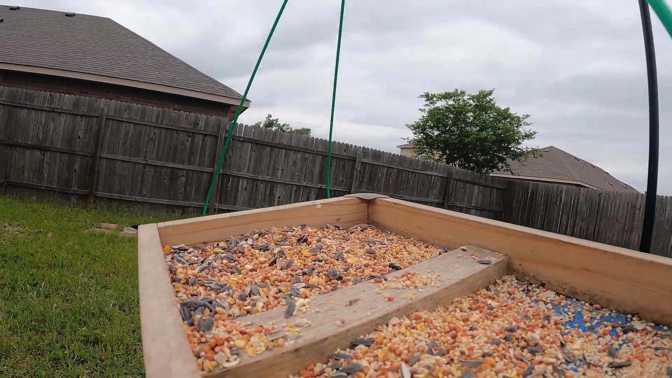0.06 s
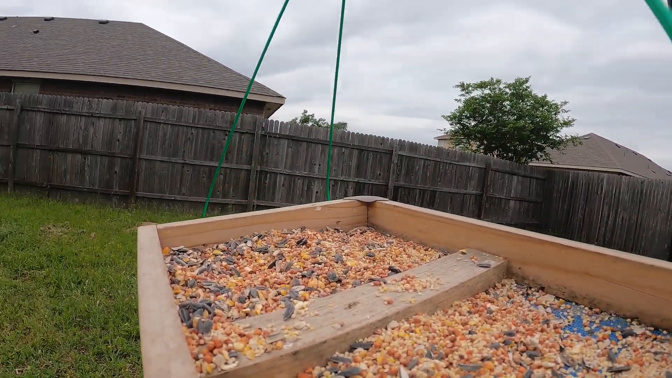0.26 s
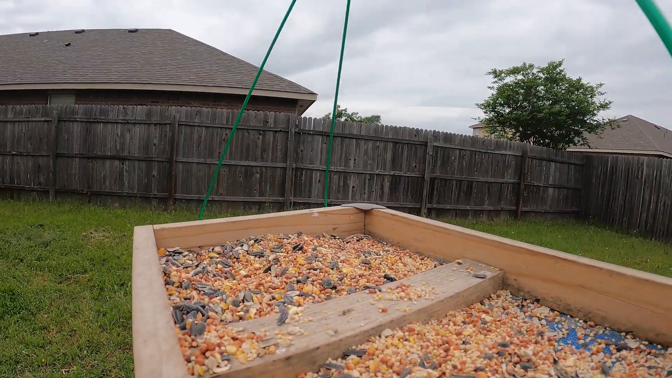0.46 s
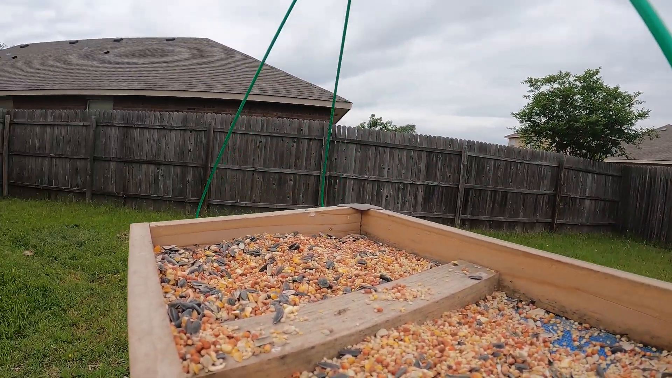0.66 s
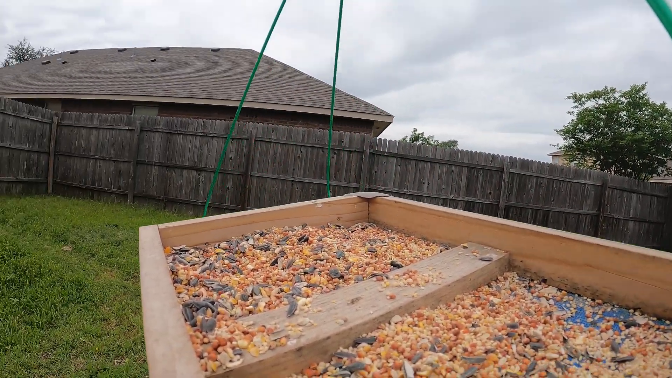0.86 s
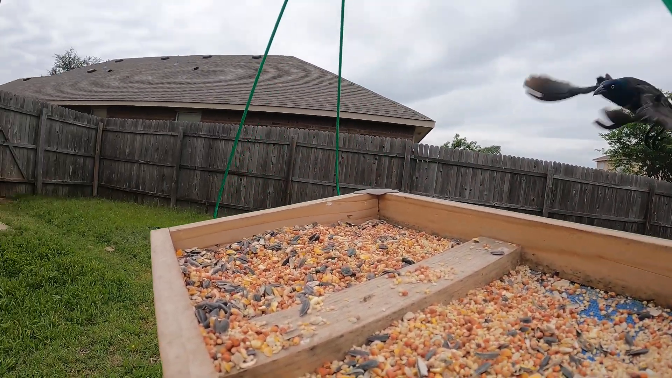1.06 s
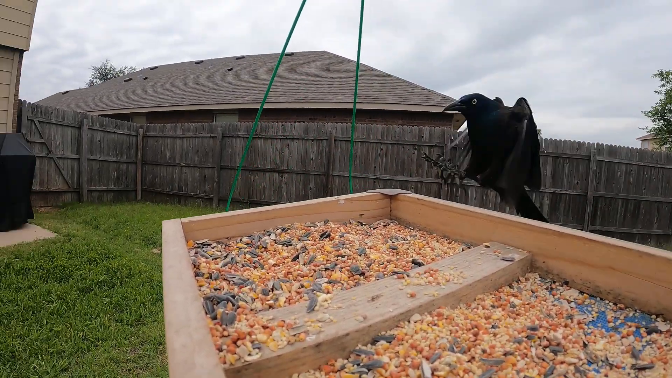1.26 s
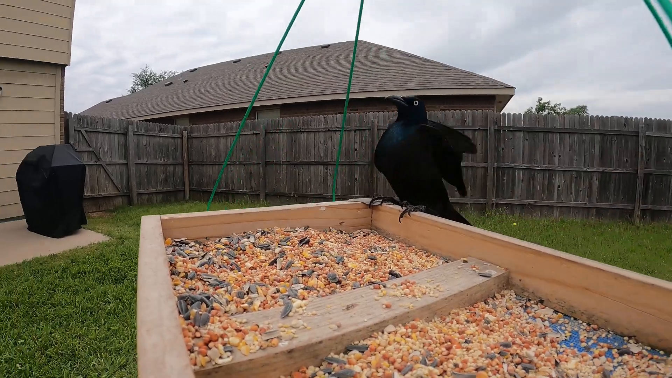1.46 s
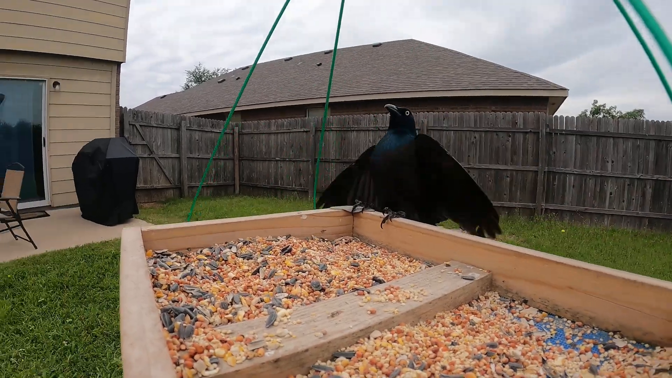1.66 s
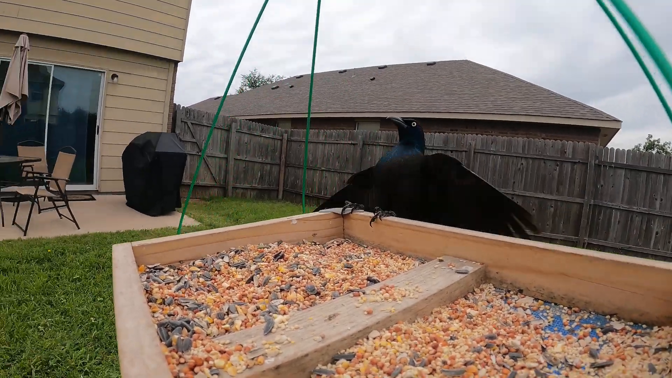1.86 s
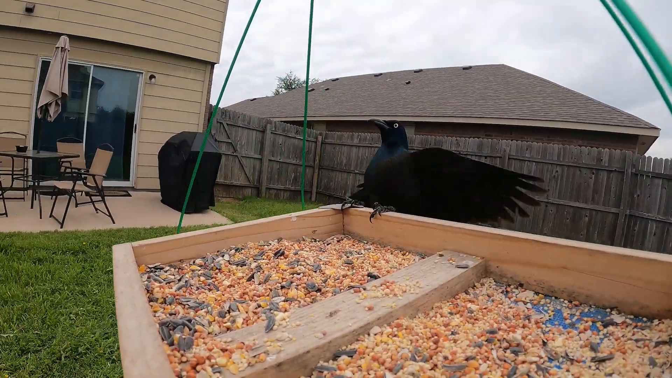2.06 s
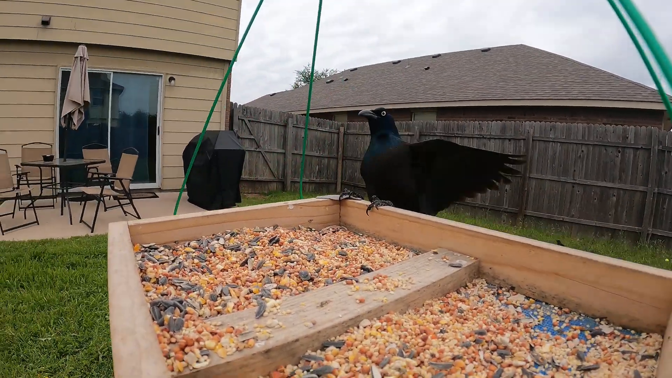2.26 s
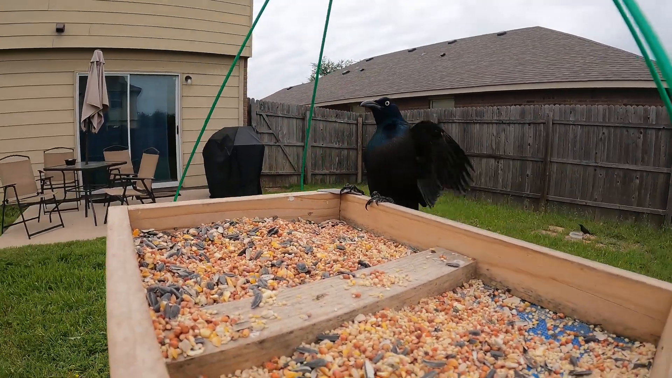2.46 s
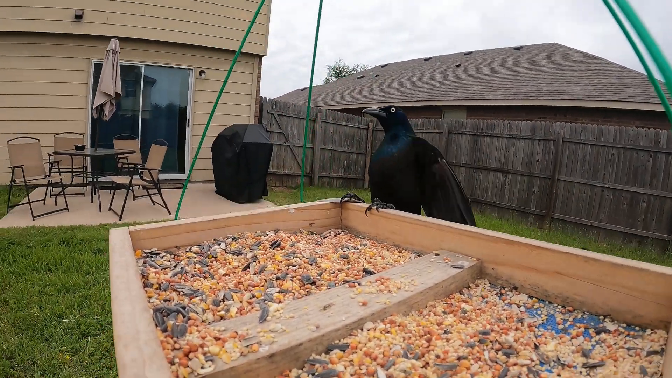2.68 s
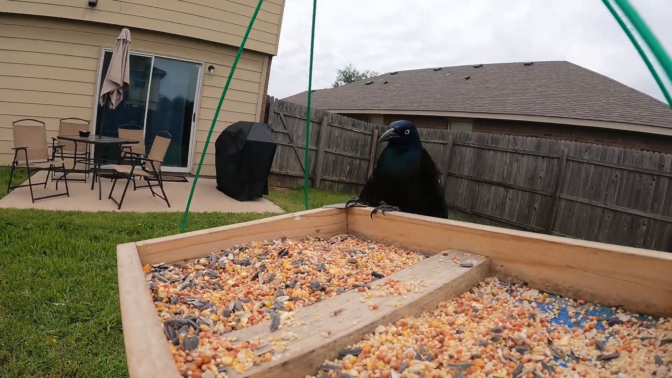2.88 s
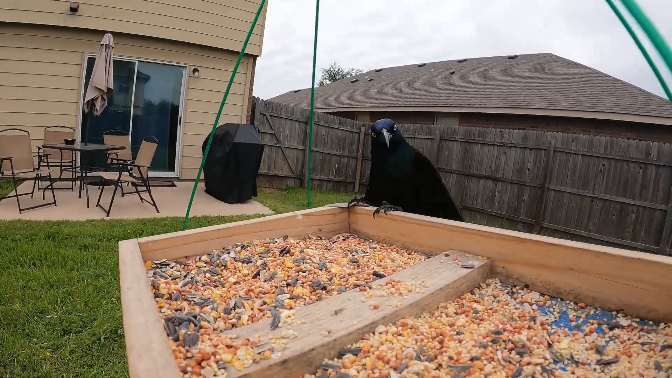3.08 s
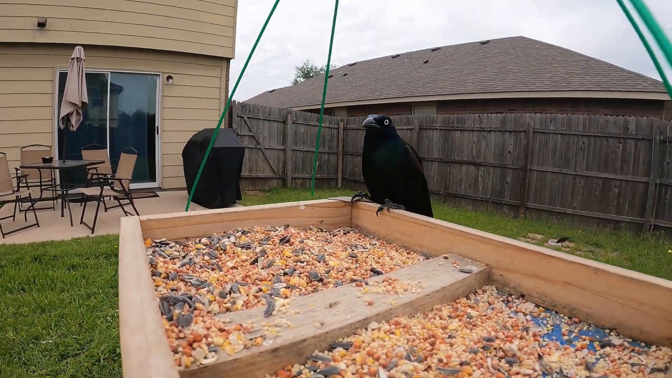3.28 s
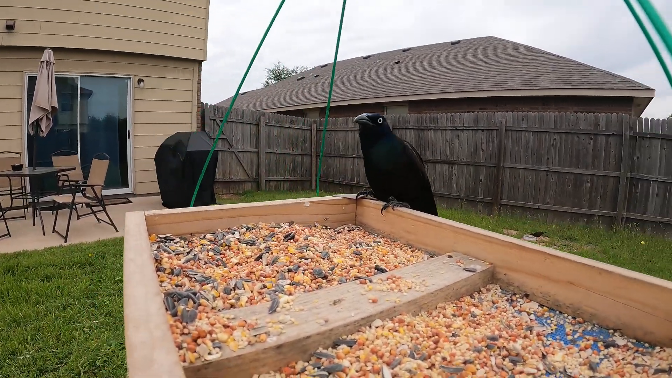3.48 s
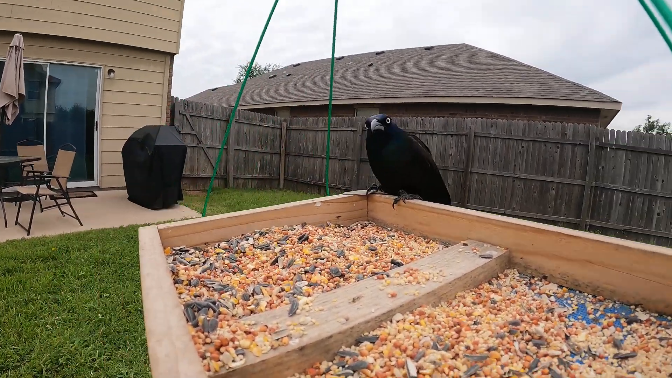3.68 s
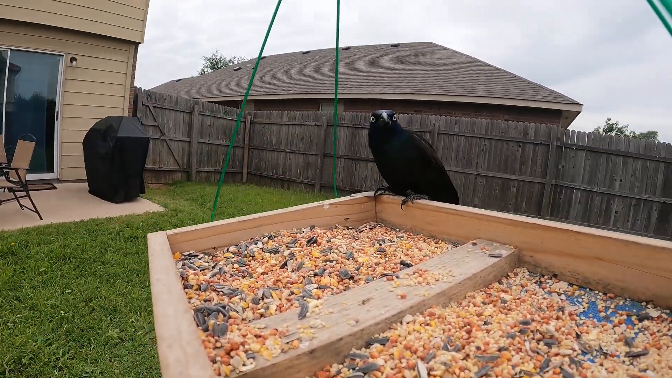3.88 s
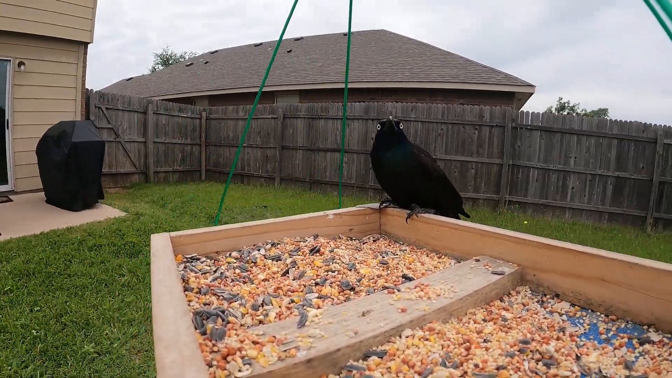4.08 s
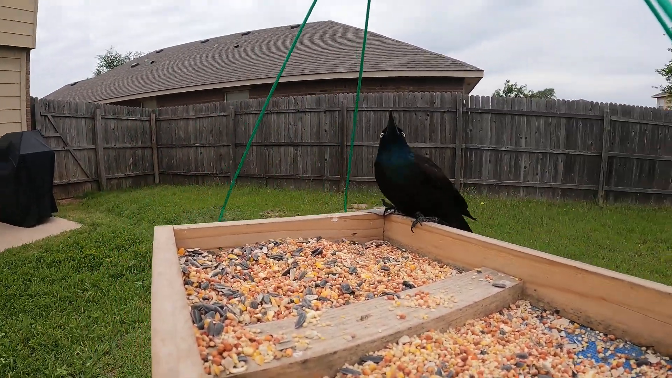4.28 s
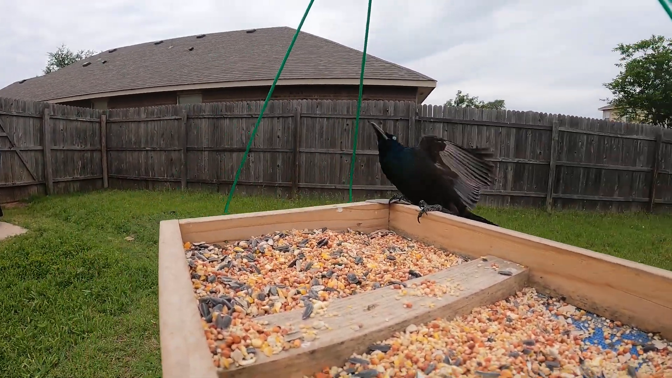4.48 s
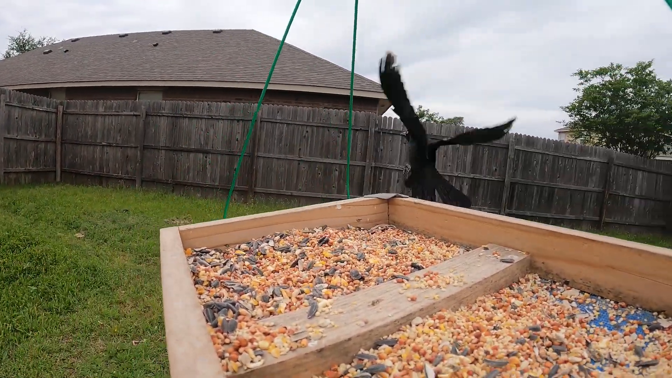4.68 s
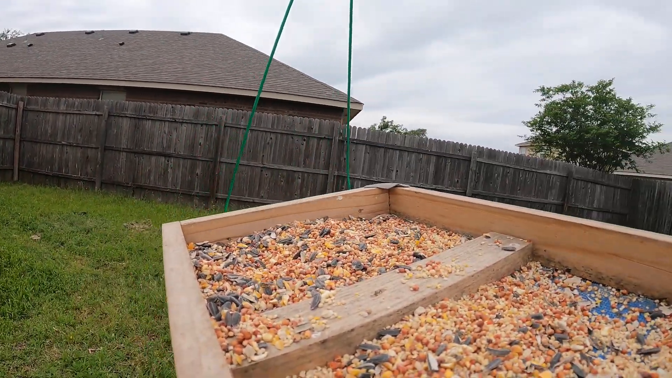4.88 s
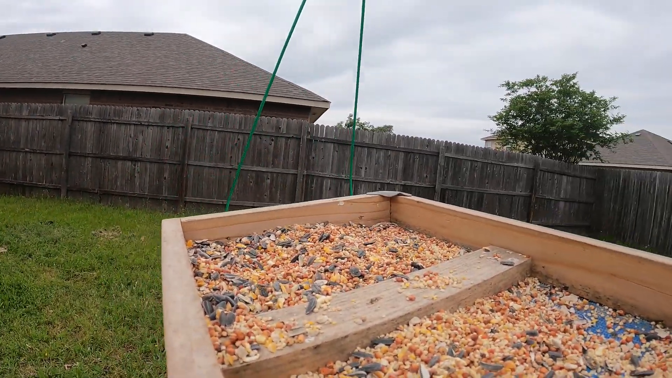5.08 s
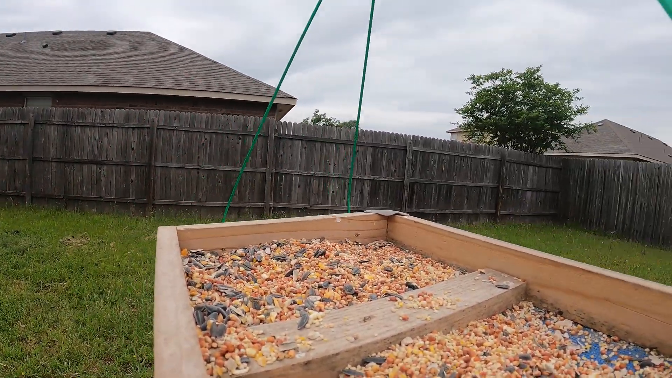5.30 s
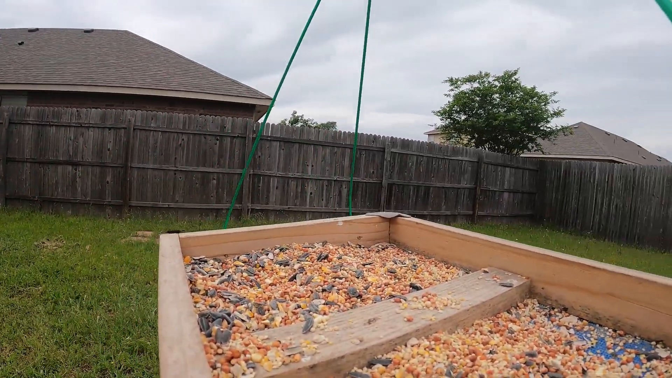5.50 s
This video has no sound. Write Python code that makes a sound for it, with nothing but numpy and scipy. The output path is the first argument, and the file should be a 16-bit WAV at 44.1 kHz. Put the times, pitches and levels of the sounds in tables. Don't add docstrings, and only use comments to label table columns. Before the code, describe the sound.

Close stereo pickup at a wooden seed tray in a yard. A big bird arrives with rapid feathery flaps and low wind thuds, lands with one hard knock, and flutters regularly while a distant bird croaks. Small chirps follow; then claw clicks, a heavy gusty take-off, receding wingbeats and far whistles.

```python
import sys
import numpy as np
from scipy import signal
from scipy.fft import rfft, irfft, next_fast_len
from scipy.io import wavfile
from scipy.ndimage import map_coordinates

SR = 44100
rng = np.random.default_rng(int(sys.argv[2]) if len(sys.argv) > 2 else 0)


def ratio_of_db(decibels):
    return 10 ** (np.asarray(decibels, float) / 20)


def wav_record(signal):
    frames = np.transpose(np.atleast_2d(signal))
    bounded = np.clip(frames, -1, 1)
    quanta = np.round(bounded * 32767).astype(np.int16)
    wavfile.write(sys.argv[1], SR, quanta)


N = 244314
T = np.arange(N) / SR

# frequency [Hz], level [dB].
TRAFFIC_SPECTRUM = [(140, -25), (230, -10.5), (270, -19), (420, -14.5), (800, -15), (1300, -14),
                    (2500, -35.5), (3500, -43.5),
                    (5700, -38.5), (9000, -49.5), (10000, -41.5), (10900, -51.5), (12200, -57.5),
                 (13200, -76.5), (14500, -96)]
# time [s], level [dB].
TRAFFIC_LEVEL = [(0.0, -63), (.7, -62.5), (1.39, -56.5), (1.56, -63), (3.5, -64), (4.15, -62.5),
                 (4.9, -64.5), (5.54, -63)]
# time [s], shaft rate [Hz], fifth order [dB], other orders [dB].
ENGINE_RUN = [(0, 20.29, -46.5, -61.5), (.37, 20.44, -46.5, -48.5), (1, 20.86, -54, -47.5),
              (1.6, 21.07, -47.5, -50), (2.5, 21.26, -48, -50), (3, 21.23, -46, -48.5),
              (3.65, 21.54, -43.5, -48.5), (3.78, 21.5, -60.5, -55.5), (4.15, 22, -49, -59),
              (4.35, 21.98, -54, -68), (5.54, 22.25, -62, -70)]
# multiple of the shaft rate, level [dB].
ENGINE_ORDERS = [(2, -16), (3, -2.5), (5, 3), (6, -2.5), (7, -9.5), (8, 4), (9, -8.5), (10, -2), (13, -26),
                 (15, -22)]
# start [s], end [s], first pitch [Hz], last pitch [Hz], level [dB].
WHISTLES = [(4.468, 4.535, 4420, 4390, -69.5), (4.525, 4.615, 4390, 4360, -73),
            (4.718, 4.795, 3500, 3490, -66), (4.795, 4.825, 3490, 3480, -73),
            (4.832, 4.935, 3465, 3495, -74), (4.935, 4.97, 3450, 3430, -79),
            (4.978, 5.032, 3425, 3445, -77), (5.03, 5.11, 3415, 3430, -73), (5.112, 5.2, 3440, 3420, -74),
            (5.2, 5.235, 3415, 3410, -78), (5.19, 5.295, 4170, 4265, -70.5), (4.72, 4.82, 4390, 4390, -79),
            (4.825, 4.95, 4390, 4400, -86)]
# start [s], end [s], pitch [Hz], level [dB], blur [Hz].
NOTES = [(3.78, 3.87, 2680, -81, 300), (4.02, 4.09, 2600, -79, 260), (4.1, 4.2, 2660, -78.5, 260),
         (4.21, 4.29, 2650, -79, 260), (4.275, 4.315, 3060, -77, 250), (3.7, 3.82, 4880, -81, 300),
         (3.87, 3.985, 4930, -78, 230), (3.99, 4.06, 4930, -77, 200), (4.08, 4.17, 4900, -79.5, 300),
         (4.165, 4.27, 4930, -80.5, 280), (3.87, 4.02, 2620, -83, 300), (3.67, 3.692, 2900, -68, 500),
         (3.665, 3.685, 3400, -70, 500), (5.32, 5.39, 6240, -73, 150), (4.85, 4.92, 6200, -74, 130),
         (4.91, 4.985, 6290, -73, 150), (5.3, 5.36, 3960, -64, 300)]
# start [s], top pitch [Hz], length [s], level [dB].
CHIPS = [(3.016, 4400, .03, -63), (3.132, 4350, .028, -64), (3.272, 4380, .04, -67),
         (3.386, 4420, .035, -68), (3.524, 4400, .055, -66), (3.655, 3900, .036, -69),
         (3.712, 2700, .03, -65), (3.745, 2700, .03, -65), (3.716, 4950, .024, -66),
         (3.792, 4350, .032, -64), (3.795, 4950, .02, -70), (3.908, 4400, .04, -70)]
# frequency [Hz], level [dB per Hz].
RASP_SPECTRUM = [(1800, -13.5), (2700, 5), (3900, -3), (5000, -5), (6500, -9.5), (9000, -26)]
# start [s], end [s], first pitch [Hz], last pitch [Hz], level [dB].
CROAK_BANDS = [
    (1.95, 2.27, 1170, 1210, -58),
    (1.94, 2.22, 2970, 2930, -58.5),
    (2.2, 2.36, 2930, 2900, -61.5),
    (1.94, 2.38, 5700, 5640, -67),
    (5.18, 5.33, 4100, 4060, -64),
    (5.22, 5.4, 3720, 3780, -67),
    (5.3, 5.6, 4130, 4180, -60),
    (5.31, 5.6, 4330, 4370, -65),
    (5.38, 5.6, 3790, 3770, -63.5),
]
# frequency [Hz], correlation [0 to 1].
FAR_LIKENESS = [(60, 0.92), (150, 0.85), (290, 0.73), (640, 0.56), (1400, 0.55), (2600, 0.28), (6800, 0.73),
                (15000, 0.29)]

# time [s], rumble level [dB].
BREEZE = [(0, -52), (.12, -43), (.85, -50.5), (1.2, -32), (1.6, -38), (2.79, -39), (4.1, -51),
          (4.35, -48.5), (4.6, -38), (5.2, -45.5), (5.43, -41), (5.54, -52)]
# time [s], rumble level [dB], width [ms], flutter below rumble [dB].
DRAUGHTS = [(.94, -38, 74, 19.5), (1.05, -38, 78, 12), (1.147, -32, 26, 14), (1.18, -27, 40, 43),
            (1.219, -26.5, 43, 22), (1.309, -28.5, 38, 15), (1.37, -23.5, 18, 31), (1.42, -43, 35, 18.5),
            (1.45, -28.5, 52, 17), (4.21, -42.5, 76, 28), (4.42, -44, 44, 5.5), (4.57, -34.5, 145, 33),
            (4.63, -49, 92, 9), (4.703, -27, 68, 18.5), (4.85, -25.5, 34, 28), (4.892, -18.5, 68, 21),
            (4.983, -24.5, 56, 18), (5.091, -28.5, 68, 26)]
# frequency [Hz], level [dB].
RUMBLE_SPECTRUM = [(10, -10), (25, -4.5), (45, -4), (90, -12), (160, -26.5), (300, -33), (500, -95)]
# frequency [Hz], level [dB].
FLUTTER_SPECTRUM = [(50, -27), (90, 2.5), (160, -1.5), (280, -10), (450, -27), (900, -67.5)]
# time [s], left minus right [dB].
WASH_PAN = [(0, -1), (4.4, 0.5), (4.9, -6), (5.54, 1.5)]

# time [s], peak [dB], brightest pitch [Hz], knock in the wood [dB], scratch beside the ring [dB].
GRIPS = [(0.382, -49, 1000, -14, -10), (0.743, -57.5, 4800, -16, -4), (0.971, -49, 1100, -15, -1),
         (0.9763, -38, 2460, -22, -7), (1.124, -36, 1300, -5, -9), (1.135, -38, 1490, -6, -6),
         (1.148, -39, 1313, -6, -6), (1.318, -40, 1100, -9, -1), (1.4053, -13.5, 3940, -9.5, 0),
         (1.4055, -15, 2404, -20.5, -2), (1.4054, -25, 5530, -21, -2.5), (1.408, -23, 1740, -3, 1.5),
         (1.4113, -24, 3270, -3.5, 0.5), (1.416, -32, 2820, -5, 0), (1.418, -32, 4670, -4, -3),
         (1.4222, -29.5, 3800, -8, 2.5), (1.4243, -26.5, 3350, -5, 0), (1.455, -39.5, 4580, -4, -6),
         (1.488, -41, 4700, -7, -6), (1.491, -42, 4900, -7, -6), (1.504, -33.5, 4230, -4.5, -8),
         (1.668, -44, 3870, -9, 3), (1.8248, -46.5, 3340, -6, -3), (1.946, -39, 1910, -12, -4),
         (2.033, -46, 3300, -20, -1), (2.045, -45, 6300, -16, -2), (2.131, -43, 4130, -4, 0),
         (2.214, -46, 6390, -20, -3), (2.268, -39, 1820, -24, -1.5), (2.371, -38, 1670, -19, -10),
         (3.1713, -48.5, 4848, -20, -2), (3.18, -51, 4730, -18, 1)]
# time [s], peak [dB], brightest pitch [Hz], knock in the wood [dB], scratch beside the ring [dB].
PUSH_OFF = [(4.359, -60, 2580, -8, 0), (4.4, -45.5, 2260, 7.5, 1), (4.441, -40.5, 2300, -4, -2),
            (4.509, -41.5, 4330, -11, 0), (4.6064, -33.5, 2100, -4.5, -8), (4.6178, -44, 1300, 11, -10),
            (4.6222, -25.5, 4120, 8, -2.5), (4.6611, -30, 5960, -12, 2), (4.6642, -23.5, 3350, -13, -14),
            (4.6725, -23.5, 2270, -17, -4), (4.675, -22.5, 4050, -25, -7), (4.6796, -20.5, 3014, -18, -14),
            (4.679, -22.5, 2320, -15, -13), (4.683, -25, 4240, -23, -20), (4.6963, -32.5, 3060, -14, -10),
            (4.764, -28, 2330, -16, -7), (4.809, -38, 2800, -9, -4), (4.968, -58, 3450, -14, 1),
            (5.324, -44, 1820, -15, -2)]
# frequency [Hz], level [dB].
SCRATCH_SPECTRUM = [(600, -34), (1300, -5), (2300, 3.5), (4200, 1), (7000, -2.5), (9000, -16.5),
                    (12500, -28), (16000, -46)]
# frequency [Hz], width [Hz], level [dB].
BOARD_MODES = [(383, 170, 4.5), (537, 500, -5.5), (953, 60, 1.5)]
# frequency [Hz], width [Hz], level [dB].
RIM_MODES = [(1265, 180, 6.5), (2310, 410, -24)]

# time [s], level [dB].
RUSTLE = [
    [(0.76, -110), (1.16, -54.5), (1.49, -68.5), (3.04, -71), (3.3, -77.5)],
    [(4.3, -83), (4.578, -79), (5.54, -73.5)],
]
# time [s], swish [dB], width [ms], dullness as lower air over swish [dB].
LANDING = [(0.822, -59.5, 42, -5), (0.856, -63, 42, 1.5), (0.895, -52, 8.6, -1.5), (0.918, -54, 15, 0.5),
           (0.947, -59, 41, 1.5), (0.99, -52.5, 36, 2), (1.032, -54, 19, 1), (1.061, -48.5, 13, 5),
           (1.078, -45, 11, -10.5), (1.094, -57.5, 9.5, -2), (1.123, -50, 13, -20), (1.153, -50.5, 16, -4),
           (1.167, -48, 19, 1), (1.18, -64, 9.9, -1), (1.225, -53.5, 50, 6.5), (1.244, -44, 15.4, -7),
           (1.296, -52.5, 30, 3), (1.328, -48.5, 25, 2.5), (1.371, -55, 46, 4.5), (1.46, -60, 83, 9),
           (1.503, -66, 18, 4), (1.61, -63.5, 19, 3)]
# time [s], swish [dB], dullness [dB], return stroke below [dB].
BALANCING = [(1.645, -52.5, -3.5, 8), (1.737, -56.5, -2.5, 2), (1.855, -54, -3.5, 2.5),
             (1.952, -54.5, 0.5, 4.5), (2.065, -55.5, 1.5, 5.5), (2.167, -56.5, 3, 3), (2.275, -53, 0.5, 9),
             (2.38, -56, 1, 4.5), (2.5, -52.5, -3, 10), (2.608, -54.5, -2, 6), (2.742, -53.5, -2.5, 8.5),
             (2.847, -52.5, 1, 11), (2.95, -55, 0.5, 13), (3.069, -55, -2.5, 10), (3.18, -57, 0, 9)]
# time [s], swish [dB], width [ms], dullness [dB].
LEAVING = [(4.32, -77, 193, -14), (4.424, -65.5, 56, 2), (4.509, -54.5, 40, -0.5), (4.555, -58, 29, 4),
           (4.619, -55, 36, 4.5), (4.651, -52, 17, 10.5), (4.697, -49.5, 35, 8), (4.715, -57.5, 39, 5),
           (4.768, -56, 23, -1), (4.793, -60.5, 72, 6.5), (4.84, -67, 51, 1), (4.903, -66, 124, -3),
           (5.1, -64, 40, 3), (5.18, -61, 46, 6.5), (5.26, -61, 55, 9.5), (5.347, -60.5, 48, 9.5),
           (5.385, -69.5, 47, 13), (5.44, -64, 48, 8.5)]
# time [s], peak [dB], left minus right [dB], swell [ms].
CLAPS = [(0.973, -34.5, -1, 3.3), (1.036, -41.5, -5, 5), (1.055, -32.5, -1, 6), (1.135, -39, 2, 5),
         (1.149, -29, -4, 3.65), (1.215, -33, -3, 9.3), (1.23, -30.5, -1.5, 3.7), (1.297, -34, -2, 4),
         (1.313, -34.5, -3, 3.1), (4.402, -44.5, -15, 3.2), (4.507, -43.5, -11, 8.1),
         (4.68, -21, -7.5, 3.33), (4.704, -38, -7, 7.4), (4.807, -35.5, -1, 5.5), (5.068, -48, -13, 3.8),
         (5.242, -44.5, 0, 7.9), (5.326, -38, 2, 2.6)]
# start [s], end [s], first pitch [Hz], last pitch [Hz], level [dB].
QUILLS = [(1, 1.014, 3800, 2700, -52), (1.088, 1.098, 5600, 3000, -47), (1.163, 1.18, 3600, 2600, -50),
          (1.177, 1.186, 5830, 3100, -45), (1.185, 1.194, 2700, 2400, -52), (1.157, 1.168, 5900, 5300, -50),
          (1.058, 1.067, 620, 1500, -37.5), (1.146, 1.154, 490, 1450, -45), (1.231, 1.24, 900, 2150, -41.5),
          (1.314, 1.323, 510, 1190, -40.5), (1.243, 1.253, 7100, 4800, -45),
          (4.707, 4.721, 6240, 4760, -54), (4.707, 4.723, 2400, 1700, -49)]
# time [s], pitch [Hz], length [ms], peak [dB], left minus right [dB].
PUFFS = [
    (1.66, 695, 23, -49.5, -8),
    (4.398, 383, 27, -47.5, -10),
    (4.81, 888, 28, -49, -2),
    (5.062, 476, 28, -49.5, -11),
    (5.138, 400, 12, -48, 0),
    (5.236, 380, 18, -44.5, 0),
    (5.32, 533, 22, -40, -1),
]
# frequency [Hz], level [dB per Hz].
SWISH_SPECTRUM = [(2500, -49), (5000, -1.5), (7500, -1.5), (8400, -4.5), (9800, -3), (11000, -9),
                  (13500, -18.5), (15800, -47)]
# frequency [Hz], level [dB].
WHOOSH_SPECTRUM = [(1500, -23), (2900, -2), (4200, -3.5), (5700, -7), (7500, -11), (11000, -46.5)]
# frequency [Hz], level [dB].
MID_AIR_SPECTRUM = [(300, -5.5), (600, -8.5), (1200, -4), (2200, -5.5), (3000, -9.5), (6000, -43.5)]
# frequency [Hz], level [dB].
LOW_AIR_SPECTRUM = [(150, 3), (330, 1.5), (700, -1.5), (1300, -7), (2500, -20), (5000, -53.5)]
# frequency [Hz], correlation [0 to 1].
NEAR_LIKENESS = [(300, 0.72), (1400, 1), (3000, 0.63), (7000, 0.96), (15000, 0.83)]
# frequency [Hz], left minus right [dB].
NEAR_LEAN = [(200, -2), (380, -11.5), (700, -5.5), (1300, -4), (2400, -1.5), (4400, -3), (8000, -1),
             (15000, 2.5)]
# frequency [Hz], phase [radians].
PORT_LEAD = [(150, 0.017), (330, 0.3), (900, -0.36), (2600, -0.65), (4200, -0.69), (6500, -0.37),
             (11500, .2)]


def unit(x):
    return x / np.sqrt(np.mean(x ** 2) + 1e-20)


def along(points, hz):
    f, v = np.transpose(points)
    return np.interp(np.log(hz + 1), np.log(f + 1), v)


def curves(rows, outside=None):
    s, *columns = np.transpose(rows)
    return [np.interp(T, s, column, outside, outside) for column in columns]


def wobble(rate, size=N):
    knots = rng.standard_normal(int(size * 500 / SR) + 4)
    return map_coordinates(knots, [T[:size] * min(rate, 500)])


def gate(start, end, edge):
    return np.clip(np.minimum(T - start, end - T) / edge, 0, 1)


def filtered(x, response):
    m = next_fast_len(N + SR // 4)
    return irfft(rfft(x, m) * response(np.fft.rfftfreq(m, 1 / SR)), m)[..., :N]


def causal(points):
    def response(hz):
        cepstrum = irfft(np.log(ratio_of_db(along(points, hz))))
        half = len(cepstrum) // 2
        return np.exp(rfft(np.r_[cepstrum[:1], 2 * cepstrum[1:half], np.zeros(len(cepstrum) - half)]))
    return response


def resonances(modes):
    def response(f):
        return sum((-1) ** k * ratio_of_db(db) * 1j * f * width / (center * center - f * f + 1j * f * width)
                   for k, (center, width, db) in enumerate(modes))
    return response


def rush(spectrum, likeness):
    def mid_side(hz):
        turn = np.arccos(np.clip(along(likeness, hz), -1, 1)) / 2
        return ratio_of_db(along(spectrum, hz)) * np.array([np.cos(turn), np.sin(turn)])
    mid, side = filtered(rng.standard_normal((2, N)), mid_side)
    return unit(np.array([mid + side, mid - side]))


def panned(pan_db):
    return ratio_of_db(np.array([pan_db / 2, -pan_db / 2]))


def lean_near(sound):
    return filtered(sound, lambda hz: panned(along(NEAR_LEAN, hz)))


def add(out, s, sound):
    part = out[:, round(s * SR):][:, :sound.shape[1]]
    part += sound[:, :part.shape[1]]


def sine(hz):
    return np.sin(2 * np.pi * np.cumsum(hz) / SR)


def tone(hz, gain, blur_hz):
    turn = 2 * np.pi * np.cumsum(hz) / SR
    waver = lambda: wobble(blur_hz, size=len(hz))
    return np.array([gain * (waver() * np.cos(turn) + waver() * np.sin(turn)) for _ in range(2)])


def swells(s, db, ms, rise=1.004, fall=0.96):
    coarse = T[::32]
    late = (coarse - s[:, None]) / (ms[:, None] * 0.00053)
    bells = np.exp(-(late * np.where(late < 0, rise, fall)) ** 2)
    return np.interp(T, coarse, (ratio_of_db(2 * db[:, None]) * bells).sum(0))


def traffic():
    drift_db = 0.4 * wobble(3) + 0.7 * wobble(25)
    level = ratio_of_db(curves(TRAFFIC_LEVEL)[0] + 5.0 + drift_db)
    return level * rush(TRAFFIC_SPECTRUM, FAR_LIKENESS)


def engine():
    shaft_hz, fifth_db, other_db = curves(ENGINE_RUN)
    turn = 2 * np.pi * np.cumsum(shaft_hz) / SR
    drone = np.zeros(N)
    for order, order_db in ENGINE_ORDERS:
        level_db = (fifth_db if order == 5 else other_db) + order_db + 1.2 * wobble(5)
        drone += ratio_of_db(level_db) * np.sin(order * turn + 1.5 * wobble(4.114))
    return panned(-0.17)[:, None] * drone


def whistles():
    fade_db, break_db, waver_hz = 2, 1.1, 16
    out = np.zeros((2, N))
    for start, end, first_hz, last_hz, db in WHISTLES:
        hz, sag_db = curves([(start, first_hz, 0), (end, last_hz, -fade_db)])
        gain = ratio_of_db(db + 11.5 + sag_db + break_db * wobble(28.29)) * gate(start, end, 0.0097)
        hz = hz + waver_hz * wobble(30)
        out += gain * sine(hz) + 0.45 * tone(hz, gain, blur_hz=120)
    return out


def notes():
    out = np.zeros((2, N))
    for start, end, hz, db, blur_hz in NOTES:
        on = slice(round(start * SR), min(round(end * SR), N))
        pitch = np.full(len(T[on]), hz)
        break_db = np.clip((-60 - db) / 6, 1, 2)
        broken = ratio_of_db(db + break_db * wobble(25, size=len(pitch)))
        out[:, on] += tone(pitch, broken * gate(start, end, 0.0037)[on], blur_hz)
    return out


def chips():
    fall_hz_per_s = 33000
    out = np.zeros((2, N))
    for s, top_hz, length, db in CHIPS:
        u = np.arange(round(length * SR)) / (length * SR)
        hz = top_hz - (top_hz > 3000) * fall_hz_per_s * length * u ** 2.3
        gain = ratio_of_db(db + 1 - 26 * u) * np.sin(np.pi * u) ** 0.5
        add(out, s, 0.95 * gain * sine(hz) + 0.5 * tone(hz, gain, blur_hz=400))
    return out


def rasp():
    breath = ratio_of_db(-79.0) * gate(3.0, 4.45, 0.032) + ratio_of_db(-78) * gate(3.66, 3.96, 0.026)
    breath += ratio_of_db(-76) * gate(3.655, 3.77, 0.015) + ratio_of_db(-67) * gate(1.93, 2.39, 0.03)
    return breath * rush(RASP_SPECTRUM, FAR_LIKENESS)


def croak():
    pulse_hz, depth, fade_db, spread_hz = 45.5, 0.3, 2.5, 250
    pulse = 1 + depth * np.cos(2 * np.pi * pulse_hz * T + wobble(8.8))
    out = np.zeros((2, N))
    for start, end, first_hz, last_hz, db in CROAK_BANDS:
        hz, sag_db = curves([(start, first_hz, 0), (end, last_hz, -fade_db)])
        gain = ratio_of_db(db + sag_db) * pulse * gate(start, end, 0.007)
        left, right = tone(hz, gain, spread_hz)
        core = gain * sine(hz + 60 * wobble(90))
        out += 0.7 * core + 0.8 * np.array([left, 0.7 * left + 0.7 * right])
    return out


def downwash():
    breeze_flutter_db, flutter_narrows = -60.5, 0.54
    s, db, ms, below_db = np.transpose(DRAUGHTS)
    slow = np.sqrt(ratio_of_db(2 * curves(BREEZE)[0]) + swells(s, db, ms))
    quick = np.sqrt(ratio_of_db(2 * breeze_flutter_db) + swells(s, db - below_db, flutter_narrows * ms))
    pressure = np.tanh(0.6 * rush(RUMBLE_SPECTRUM, [(50, 0.9)]))
    smooth = filtered(pressure, lambda hz: 1 / (1 + (hz / 170) ** 4))
    rumble = ratio_of_db(-0.5) * slow * unit(smooth)
    lumps = ratio_of_db(1.1 * wobble(30)) * rush(FLUTTER_SPECTRUM, [(100, 1.0), (300, 0.74)])
    flutter = ratio_of_db(9.0) * quick * unit(lumps)
    return panned(curves(WASH_PAN)[0]) * (rumble + flutter)


def seeds():
    when, size = rng.random((2, 90))
    ticks = np.bincount((when * N).astype(int), ratio_of_db(-73 + 5 * size ** 2), N)
    burst = rng.standard_normal(SR // 100) * ratio_of_db(-60 * T[:SR // 100] / 0.0027)
    husk = [(2500, -21.5), (6000, -3.5), (13000, -32.0)]  # (Hz, dB)
    return filtered(signal.fftconvolve(ticks, burst)[:N], lambda hz: ratio_of_db(along(husk, hz)))


def claws():
    rings, scratches, boards, rims = np.zeros((4, 2, N))
    t = np.arange(SR // 40) / SR
    touches = [(*row, 0.013, 0.46, -1.8) for row in GRIPS]
    touches += [(*row, 0.015, -14.5, 0.61) for row in PUSH_OFF]
    draws = rng.standard_normal((len(touches), 3, len(t)))
    for touch, (shared, left, right) in zip(touches, draws):
        s, db, hz, knock_db, scratch_db, t60, board_db, rim_db = touch
        onset = (1 - np.exp(-t / 0.00032)) * (1 + 1.12 * np.exp(-t / 0.0013))
        fade = ratio_of_db(db - 7.5 - 60 * t / t60) * onset
        ring = np.sin(2 * np.pi * hz * t + np.cumsum(shared) * 0.06)
        add(rings, s, 0.95 * fade * ring[None])
        add(scratches, s, 2.04 * ratio_of_db(scratch_db) * fade * (shared + 0.36 * np.array([left, right])))
        add(boards, s + 0.00439, ratio_of_db([[db + knock_db + board_db + 34.0]]))
        add(rims, s + 0.00057, ratio_of_db([[db + knock_db + rim_db + 30.0]]))
    knocks = filtered(boards, resonances(BOARD_MODES)) + filtered(rims, resonances(RIM_MODES))
    wood = filtered(knocks, lambda hz: 1 / (1 + 1j * hz / 2200) ** 2)
    return lean_near(rings + filtered(scratches, causal(SCRATCH_SPECTRUM)) + wood)


def strokes():
    down_ms, return_ms, return_lag_s = 23.4, 35.6, 0.033
    return_dulls = 0.77
    down = [(s, db, down_ms, dull) for s, db, dull, below in BALANCING]
    back = [(s + return_lag_s, db - below, return_ms, dull + return_dulls * below)
            for s, db, dull, below in BALANCING]
    return np.transpose(LANDING + down + back + LEAVING)


def feathers():
    s, db, ms, dull_db = strokes()
    rustle = sum(ratio_of_db(2 * curves(rows, outside=-120)[0]) for rows in RUSTLE)

    def layer(level_db, rustle_share, spectrum):
        crackle = ratio_of_db(2.3 * wobble(300) + 1.83 * wobble(60))
        return np.sqrt(swells(s, level_db, ms) + rustle_share * rustle) * crackle * rush(spectrum, NEAR_LIKENESS)

    swish = layer(db - 4.0, 0.24, SWISH_SPECTRUM)
    whoosh = layer(db + dull_db - 7.0, 1.0, WHOOSH_SPECTRUM)
    body = layer(db + 0.87 * dull_db - 2.0, 1.3, MID_AIR_SPECTRUM)
    return swish + whoosh + body


def quills():
    out = np.zeros((2, N))
    for start, end, first_hz, last_hz, db in QUILLS:
        u = np.linspace(0, 1, round((end - start) * SR))
        hz = first_hz + (last_hz - first_hz) * u
        gain = ratio_of_db(db) * np.sin(np.pi * u)
        add(out, start, 0.9 * tone(hz, gain, blur_hz=475)[:1] + 0.55 * gain * sine(hz))
    return out


def claps():
    out = np.zeros((2, N))
    air = rush(LOW_AIR_SPECTRUM, [(500, 1.0)])
    for s, peak_db, pan_db, swell_ms in CLAPS:
        u = T[:SR // 16] * 1000 / swell_ms
        swell = ratio_of_db(peak_db - 2.0) * u ** 2 * np.exp(-u)
        add(out, s - 1.83 * swell_ms / 1000, panned(pan_db)[:, None] * swell)
    return out * air


def puffs():
    out = np.zeros((2, N))
    for s, hz, ms, db, pan_db in PUFFS:
        u = np.linspace(0, 1, round(ms * SR / 1000))
        note = sine(hz * (1 - 0.13 * u)) * np.sin(np.pi * u ** 0.52) ** 2
        add(out, s, ratio_of_db(db) * panned(pan_db)[:, None] * note)
    return out


def wings():
    return lean_near(feathers() + quills()) + claps() + puffs()


def scene():
    far = traffic() + engine() + whistles() + notes() + chips() + rasp() + croak()
    return far + downwash() + seeds() + claws() + wings()


def band_limit(x):
    return signal.sosfilt(signal.butter(12, 15980, fs=SR, output="sos"), x)


def record(dry):
    top_hz = 15730
    sides = np.array([[1], [-1]])
    ports = filtered(dry, lambda hz: (hz < top_hz) * np.exp(0.5j * along(PORT_LEAD, hz) * sides))
    return band_limit(ports)


dry = scene()
out = record(dry)
wav_record(out)
```